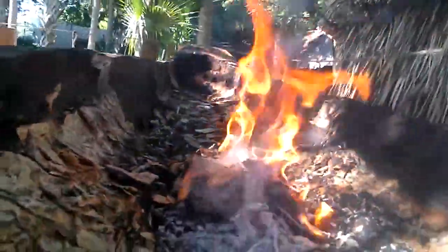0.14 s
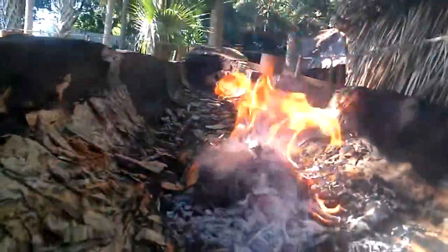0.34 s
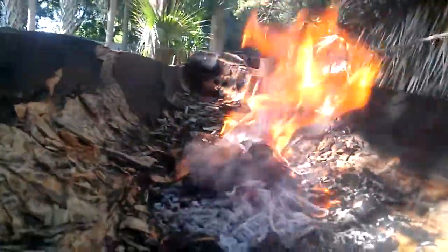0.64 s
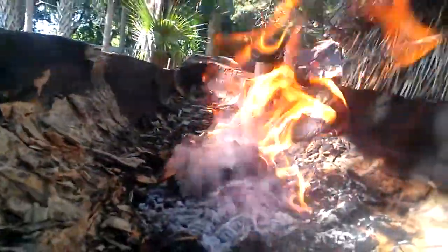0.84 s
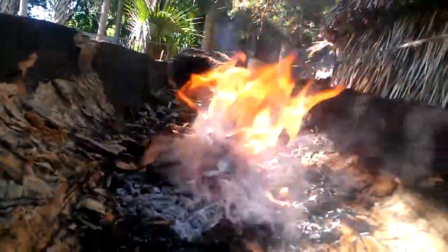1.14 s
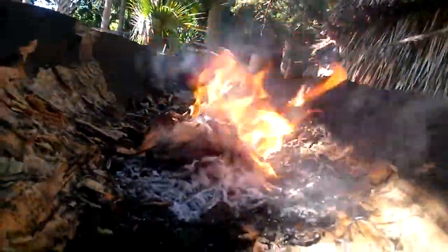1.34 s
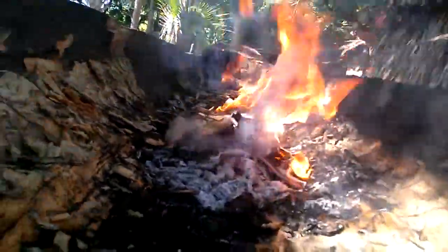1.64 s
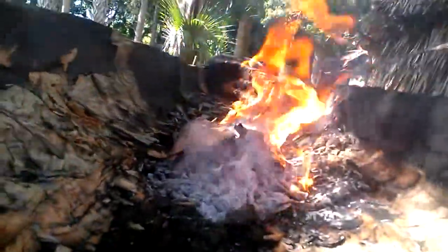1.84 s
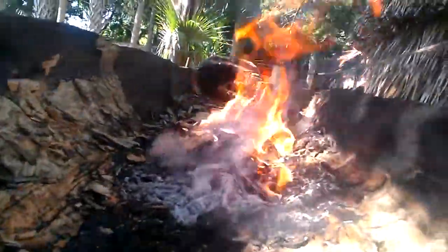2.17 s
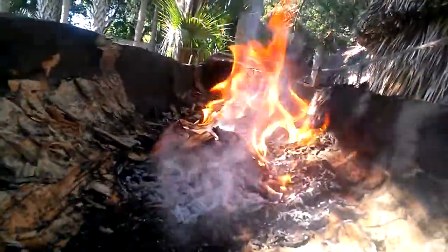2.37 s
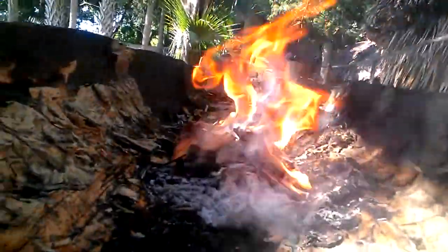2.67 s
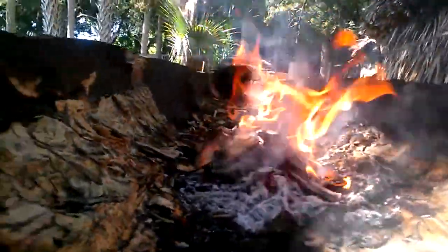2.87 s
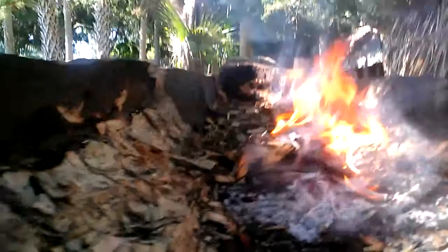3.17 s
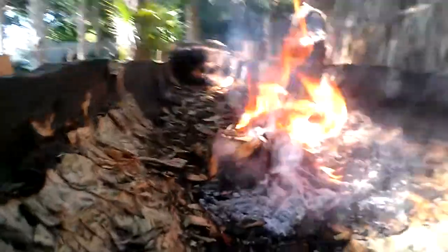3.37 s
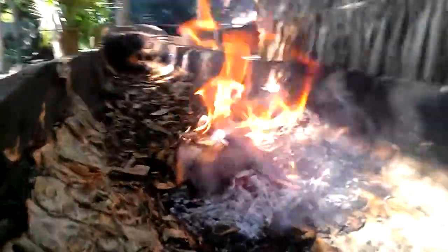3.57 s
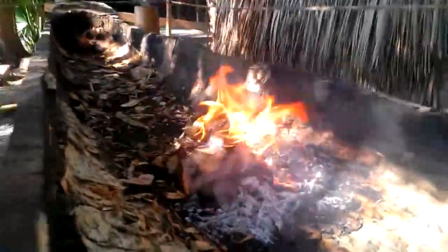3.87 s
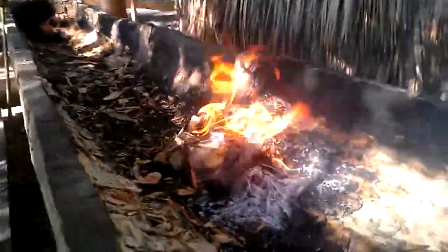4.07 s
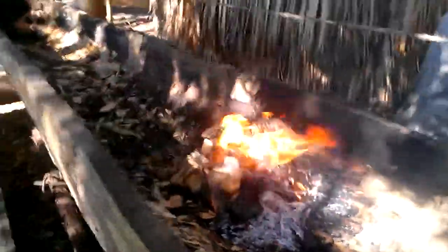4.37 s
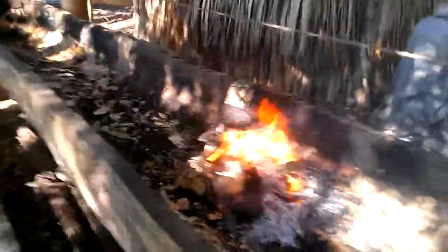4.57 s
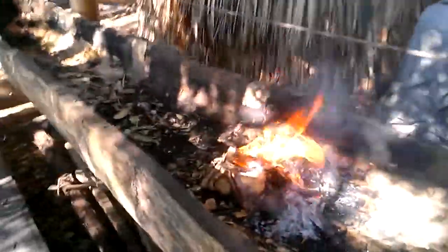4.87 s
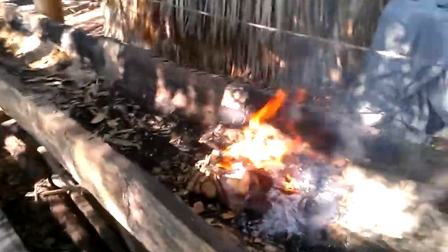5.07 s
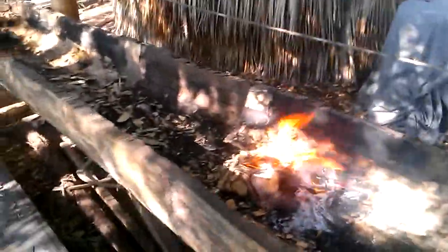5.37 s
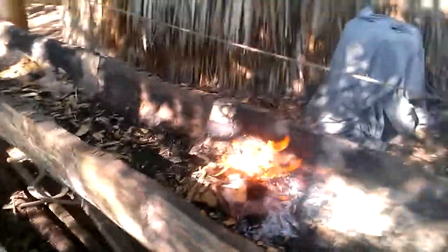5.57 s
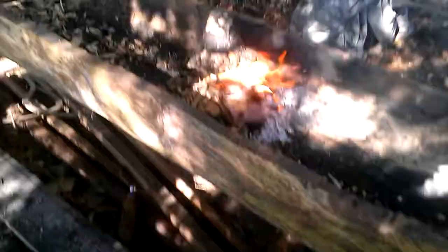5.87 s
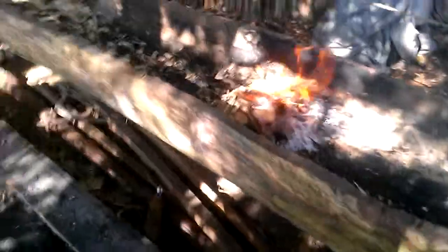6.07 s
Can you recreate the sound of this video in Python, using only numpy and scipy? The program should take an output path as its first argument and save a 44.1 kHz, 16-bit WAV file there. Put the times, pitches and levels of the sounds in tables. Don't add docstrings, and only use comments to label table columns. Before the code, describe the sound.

Shrill cicadas throb and buzz over a steady high hiss while a small fire flutters softly, pops twice, and a handheld microphone creaks at the end.

```python
import sys
import numpy as np
from scipy import signal
from scipy.fft import rfft, irfft, next_fast_len
from scipy.io import wavfile
from scipy.ndimage import uniform_filter1d

SR = 44100
rng = np.random.default_rng(int(sys.argv[2]) if len(sys.argv) > 2 else 0)


def convert_level_to_amplitude(level_db):
    exponent = np.asarray(level_db, float) / 20
    return 10 ** exponent


def generate_wav(sig):
    pcm = np.round(np.clip(np.atleast_2d(sig).T, -1, 1) * 32767).astype(np.int16)
    wavfile.write(sys.argv[1], SR, pcm)


N = 274293


def rms_one(x):
    return x / np.sqrt(np.mean(x ** 2) + 1e-20)


def in_time(rows):
    s, *columns = np.transpose(rows)
    return [np.interp(np.arange(N) / SR, s, c) for c in columns]


def drift(rate_hz):
    every = 40
    r = np.exp(-2 * np.pi * rate_hz * every / SR)
    white = rng.standard_normal(N // every + 2002)
    slow = signal.lfilter([1], [1, -2 * r, r * r], white)[2000:]
    return np.interp(np.arange(N) / every, np.arange(len(slow)), rms_one(slow - slow.mean()))


def coloured(x, spectrum):
    size = next_fast_len(N)
    hz, db = np.transpose(spectrum)
    bin_hz = np.arange(size // 2 + 1) * SR / size
    gain = convert_level_to_amplitude(np.interp(np.log(bin_hz + 1), np.log(hz), db, -90, -90))
    return rms_one(irfft(rfft(x, size) * gain, size)[:N])


def resonate(x, hz, width_hz):
    r = np.exp(-np.pi * width_hz / SR)
    zeros = (1 - r * r) / 2 * np.array([1, 0, -1])
    return signal.lfilter(zeros, [1, -2 * r * np.cos(2 * np.pi * hz / SR), r * r], x)


def add(out, s, shape):
    i = max(round(s * SR), 0)
    out[i:i + len(shape)] += shape[:N - i]


def push(db, width_ms):
    size = round(1.86 * width_ms * SR / 1000)
    return convert_level_to_amplitude(db) * np.sqrt(np.hanning(size)) * np.bartlett(size)


SINGER_DB = -21


def cicada(table, throb_hz, body, buckle_hz, on_share, edge, lean, pulsed):
    lead, effort_db = in_time(table)
    turn = 2 * np.pi * (throb_hz * np.arange(N) / SR + lead)
    leaning = np.cos(turn + lean * np.cos(turn))
    opening = 0.5 + 0.5 * np.tanh((leaning - np.cos(np.pi * on_share)) / edge)
    buckle = np.cumsum(buckle_hz * (1 + 0.038 * drift(18))) / SR % 1
    burst = np.exp(-4.0 * buckle) * (1 + 0.38 * np.cos(6 * np.pi * buckle))
    ribs = rng.standard_normal(N) * (1 + pulsed * burst)
    song = np.zeros(N)
    for k, (hz, width_hz, db) in enumerate(body):
        once = resonate(ribs, hz, 1.43 * width_hz)
        song += (-1) ** k * convert_level_to_amplitude(db) * resonate(once, hz, 1.43 * width_hz)
    return convert_level_to_amplitude(SINGER_DB + effort_db + 0.39 * drift(18.0)) * opening * rms_one(song), opening


# (time [s], throb lead [cycles], effort [dB])
FAST_SINGER = [(0.0, 0.01, -1.8), (0.52, -0.34, 0.3), (1.04, -0.47, -1.1), (1.56, -0.61, -0.5),
               (2.07, -0.58, 0.8), (2.59, -0.67, 0), (3.11, -0.57, 1.9), (3.63, -0.62, -0.7),
               (4.15, -0.57, -4), (4.66, -0.46, -3.3), (5.18, -0.38, -4), (5.7, -0.42, 2), (6.22, -0.38, 4)]
SLOW_SINGER = [(0.0, 0.58, -1.8), (0.52, 0.42, -1), (1.04, 0.4, -1.5), (1.56, 0.37, 1.1), (2.07, 0.13, -6),
               (2.59, 0.071, 0.8), (3.11, 0.59, -7.5), (3.63, 0.5, -1.5), (4.15, 0.42, -6.5),
               (4.66, 0.47, -4.5), (5.18, 0.56, -2.9), (5.7, 0.38, -5), (6.22, 0.39, -5)]
# (pitch [Hz], width [Hz], level [dB])
FAST_BODY = [(7025, 740, -7), (7370, 360, 0.5), (7930, 580, -2), (9210, 1390, -11.5), (12100, 1600, -29.5),
             (15600, 2000, -23)]
SLOW_BODY = [(7410, 560, -2), (7820, 460, -3.5), (8696, 550, -1), (9420, 1400, -22.5), (12200, 3700, -23.5),
             (15500, 1200, -20)]
FAST_THROB_HZ, SLOW_THROB_HZ = 11.35, 9.2
UNISON_DB = 1.5


def duet(facing_db):
    fast, fast_open = cicada(FAST_SINGER, FAST_THROB_HZ, FAST_BODY, 232,
                             on_share=0.52, edge=0.55, lean=0.25, pulsed=0.6)
    slow, slow_open = cicada(SLOW_SINGER, SLOW_THROB_HZ, SLOW_BODY, 226,
                             on_share=0.5, edge=0.3, lean=0.2, pulsed=0.8)
    return convert_level_to_amplitude(facing_db + UNISON_DB * fast_open * slow_open) * (fast + slow)


# (time [s], level [dB])
FLAME = [(0.0, 2), (0.3, -1), (1.2, -0.5), (1.45, -1.5), (1.65, 2.5), (2.25, 0.5), (2.65, -1), (2.95, 0.5),
         (3.3, 1.5), (4.02, 0), (4.7, -5), (5.7, -3.5), (6.22, -2.5)]
# (pitch [Hz], level [dB per Hz])
ROAR = [(12, -13), (20, -9), (129, -10.5), (193, -7.5), (280, 0), (370, -14.5), (729, -33), (800, -35.5),
        (1040, -37.5), (1760, -120)]
# (time [s], peak level [dB])
FLAPS = [(0.2154, -22.5), (1.0589, -28), (1.3992, -25), (1.5571, -20), (1.5671, -20), (1.744, -20),
         (1.7512, -19), (2.007, -20), (2.0857, -22), (2.0945, -16.5), (2.1723, -25), (2.2674, -21),
         (2.2807, -17.5), (2.3852, -22), (2.8393, -17.5), (2.9986, -16.5), (3.11, -19), (3.2572, -20),
         (3.3023, -15.5), (3.324, -19.5), (3.3685, -18.5), (3.4876, -23.5), (3.6001, -18), (3.7276, -17),
         (3.9469, -25), (5.3567, -25)]
# (time [s], peak level [dB], pitch [Hz], fall by 60 dB [ms])
POPS = [
    (4.6515, -6.5, 5500, 2.2),
    (4.9821, -6, 10500, 2.8),
    (4.9825, -5, 6200, 3.0),
    (4.858, -24, 4200, 4.0),
    (5.9055, -23, 1100, 6.0),
    (4.849, -32, 1600, 5.0),
    (6.01, -31, 1700, 5.0),
    (3.632, -36, 1500, 5.0),
    (5.555, -28, 900, 6.0),
]
ROAR_DB, ROAR_FOLLOWS, FLUTTER_DB = -31, 0.6, -34
FLAP_MS, FLAP_MS_PER_DB, THINNEST_FLAP_MS = 1.96, 0.69, 2.2
SMALL_FLAPS, SMALL_FLAP_DB, SMALL_FLAP_SPREAD_DB = 30, -27, 5.0


def fire():
    vigour_db, = in_time(FLAME)
    noise = coloured(rng.standard_normal(N), ROAR)
    low = signal.sosfilt(signal.butter(2, 170, fs=SR, output="sos"), noise)
    high = signal.sosfilt(signal.butter(2, 170, "high", fs=SR, output="sos"), noise)
    roar = convert_level_to_amplitude(ROAR_DB + ROAR_FOLLOWS * vigour_db) * rms_one(low)
    lumps = convert_level_to_amplitude(1.6 * drift(35))
    flutter = convert_level_to_amplitude(FLUTTER_DB + vigour_db) * lumps * rms_one(high)

    small = []
    for when, size in rng.random((SMALL_FLAPS, 2)):
        db = SMALL_FLAP_DB + SMALL_FLAP_SPREAD_DB * (size - 0.5) + vigour_db[int(when * N)]
        small.append((when * N / SR, db))
    flaps = np.zeros(N)
    for s, db in FLAPS + small:
        width_ms = max(FLAP_MS + FLAP_MS_PER_DB * (db + 20), THINNEST_FLAP_MS)
        add(flaps, s - width_ms / 830, -push(db + 3.0, width_ms))
    out = roar + flutter + signal.lfilter(*signal.butter(1, 60, "high", fs=SR), flaps)

    t = np.arange(400) / SR
    splinters = np.diff(rng.standard_normal((len(POPS), 401)))
    for (s, db, hz, t60_ms), splinter in zip(POPS, splinters):
        fade = convert_level_to_amplitude(db - 60 * 1000 * t / t60_ms)
        add(out, s, fade * (np.sin(2 * np.pi * hz * t) + 0.15 * splinter))
    return out


# (time [s], peak level [dB], width [ms])
BUMPS = [
    (4.8597, -14, 1.2),
    (4.859, -22, 10.5),
    (5.5483, -20, .8),
]
# (time [s], thump level [dB], snap level [dB])
CREAK = [
    (6.132, -12.5, -13),
    (6.1395, -10, -9),
    (6.151, -13, -46),
    (6.1595, -9, -16),
    (6.1659, -14.5, -12),
    (6.1719, -17, -18),
]


def handling():
    out, t = np.zeros(N), np.arange(700) / SR
    for s, db, width_ms in BUMPS:
        add(out, s - width_ms / 830, push(db, width_ms))
    rebound = np.exp(-t / 0.0028) * np.minimum(t / 0.0014, 1)
    thump = -np.sin(2 * np.pi * 150 * t + 0.31) * rebound
    snap = np.sin(2 * np.pi * 2100 * t) * np.exp(-t / 0.00029)
    for s, thump_db, snap_db in CREAK:
        add(out, s, convert_level_to_amplitude(thump_db) * thump + convert_level_to_amplitude(snap_db) * snap)
    return out


# (time [s], pitch [Hz], peak level [dB])
BIRDS = [
    (.125, 3300, -50),
    (.172, 3280, -43),
    (.198, 3100, -41),
    (.23, 3070, -49),
    (1.46, 1510, -50),
    (1.52, 1460, -55),
]
NOTE_FADE_DB_PER_S, NOTE_FALL_PER_S = 551, 0.67
HORN_HZ, HORN_DB, HORN_SAG_DB_PER_S = 522, -46.5, 7.5
HORN_START_S, HORN_END_S, HORN_ATTACK_S, HORN_RELEASE_S = 4.74, 5.49, 0.054, 0.034


def far_calls():
    t = np.arange(N) / SR
    attack = np.clip((t - HORN_START_S) / HORN_ATTACK_S, 0, 1)
    release = np.clip((HORN_END_S - t) / HORN_RELEASE_S + 1, 0, 1)
    horn_db = HORN_DB - HORN_SAG_DB_PER_S * (t - HORN_START_S) + 1.4 * drift(7.2)
    out = attack * release * convert_level_to_amplitude(horn_db) * np.sin(2 * np.pi * HORN_HZ * t)

    waver = 0.0176 * drift(58)
    near = np.arange(-2205, 2205) / SR
    for s, hz, db in BIRDS:
        pitch = hz * (1 - NOTE_FALL_PER_S * near + waver[round(s * SR):][:len(near)])
        swell = convert_level_to_amplitude(db - NOTE_FADE_DB_PER_S * np.abs(near))
        add(out, s + near[0], swell * np.sin(2 * np.pi * np.cumsum(pitch) / SR))
    return out


# (pitch [Hz], level [dB per Hz])
CHORUS = [(4500, -64), (5600, -31), (6450, -15), (7070, -2.5), (7400, -0.5), (8200, -1.5), (8880, -5),
          (10900, -17), (13600, -22.5), (15500, -19.5), (16500, -17)]
HISS = [(1240, -104), (2100, -16), (2630, -3), (3570, -4.5), (4670, 1), (5740, -4), (6000, -5), (7800, -16),
        (13200, -120)]
RUSTLE = [(290, -67), (500, -4.5), (736, -4.5), (1080, -5), (1810, -3.5), (2190, -5), (2400, -4.5),
          (3120, -20), (5280, -120)]
# (time [s], peak level [dB])
SHIFTS = [
    (4.67, -51.5),
    (4.86, -53.5),
    (5.199, -53),
    (5.56, -52.5),
    (6.16, -56),
]
SHIFT_RISE_S, SHIFT_FALL_S = 0.038, 0.082
CHORUS_DB, CHORUS_FOLLOWS = -24.5, 0.74
HISS_DB, HISS_FOLLOWS = -43, 0.1
LIFT_S, LIFT_TAKES_S, LIFT_HISS_DB_PER_S = 3.53, 1, 1.8
RUSTLE_DB, LIFTED_RUSTLE_DB, RUSTLE_FOLLOWS_FLAME = -55.5, -46, 1.1


def wood(facing_db):
    t = np.arange(N) / SR
    white = rng.standard_normal((3, N))
    chorus_db = CHORUS_DB + CHORUS_FOLLOWS * facing_db + 1.5 * drift(19)
    chorus = convert_level_to_amplitude(chorus_db) * coloured(white[0], CHORUS)

    lifted = np.maximum(t - LIFT_S, 0)
    hiss_db = HISS_DB + HISS_FOLLOWS * facing_db + LIFT_HISS_DB_PER_S * lifted
    hiss = convert_level_to_amplitude(hiss_db + 0.71 * drift(21)) * coloured(white[1], HISS)

    vigour_db, = in_time(FLAME)
    raised = np.minimum(lifted / LIFT_TAKES_S, 1)
    rustle_db = RUSTLE_DB + (LIFTED_RUSTLE_DB - RUSTLE_DB) * raised
    rustle = convert_level_to_amplitude(rustle_db + RUSTLE_FOLLOWS_FLAME * vigour_db)
    for s, db in SHIFTS:
        rustle += convert_level_to_amplitude(db) * np.exp(-np.maximum((s - t) / SHIFT_RISE_S, (t - s) / SHIFT_FALL_S))
    grain_db = 1.8 * np.minimum(rng.exponential(1, N // 64 + 1), 4)
    grains = white[2] * convert_level_to_amplitude(grain_db).repeat(64)[:N]
    gusts = convert_level_to_amplitude(1.3 * drift(14))
    return chorus + hiss + rustle * gusts * coloured(grains, RUSTLE)


# (time [s], level [dB])
FACING = [
    (0, 0.36),
    (2.0, -0.4),
    (3.6, 0.5),
    (4.3, 0),
    (4.7, 0.8),
    (5.05, 5.5),
    (5.4, 2.1),
    (5.8, 3.5),
    (6.22, 2),
]


def scene():
    facing_db, = in_time(FACING)
    mid = duet(facing_db) + fire() + handling() + far_calls() + wood(facing_db)
    # (pitch [Hz], level [dB per Hz])
    side_colour = [(60, -6), (400, -5.0), (900, -19), (3500, 2), (7000, -2.0), (15500, -0.5)]
    side = convert_level_to_amplitude(-56) * coloured(rng.standard_normal(N), side_colour)
    return np.array([mid + side, mid - side])


# (pitch [Hz], level under its surroundings [dB], how far a peak of the song raises that limit [0-1])
KEPT = [(500, -12, 0), (900, -2.8, .3), (1300, -1.6, .3), (2000, -1.0, .3), (2500, -6, .3),
        (4000, -1.3, .15), (5700, -1.2, .15), (6300, -12, 0), (11500, -8, 0), (13200, -1.8, .3),
        (15600, -2.4, .3)]


def empty_faint_bands(x):
    hz, _, cells = signal.stft(x, SR, nperseg=2048, noverlap=1536)
    power = np.mean(np.abs(cells) ** 2, axis=0) + 1e-20
    song = power[(hz > 7000) & (hz < 9000)].mean(axis=0)
    peak = song / uniform_filter1d(song, size=150)
    local = uniform_filter1d(uniform_filter1d(power, size=5, axis=0), size=6, axis=1)
    smooth = uniform_filter1d(power, size=24, axis=0)
    around = np.exp(uniform_filter1d(np.log(smooth), size=200, axis=1))
    edge_hz, limit_db, raised = np.transpose(KEPT)
    limit = convert_level_to_amplitude(2 * np.interp(hz, edge_hz, limit_db))[:, None]
    limit = limit * peak ** np.interp(hz, edge_hz, raised)[:, None]
    kept = cells * (local > around * limit)
    return signal.istft(kept, SR, nperseg=2048, noverlap=1536)[1][:, :N]


def top_cut(x):
    return signal.sosfilt(signal.butter(12, 15750, fs=SR, output="sos"), x)


def record(dry):
    mix = empty_faint_bands(dry)
    return top_cut(mix)


dry = scene()
out = record(dry)
generate_wav(out)
```